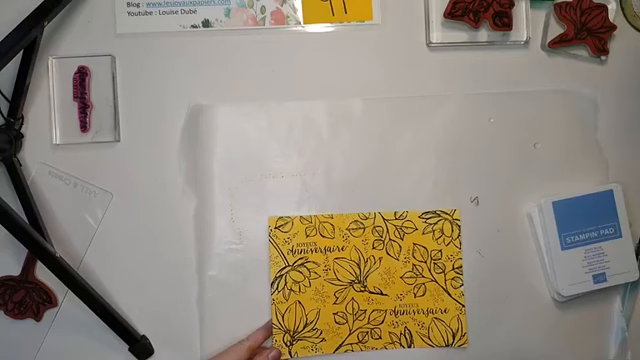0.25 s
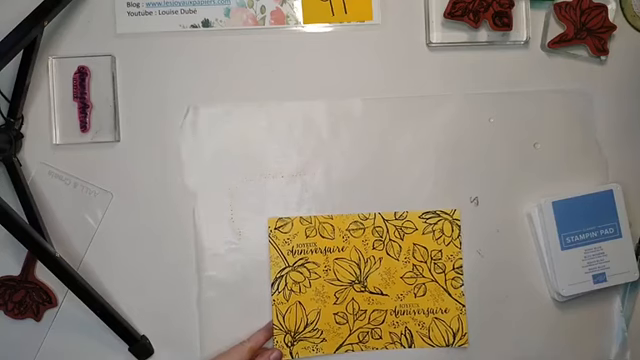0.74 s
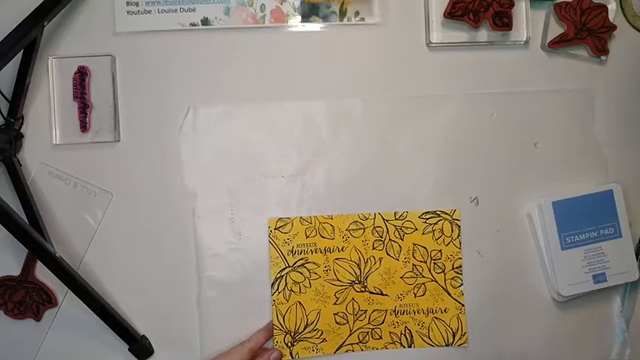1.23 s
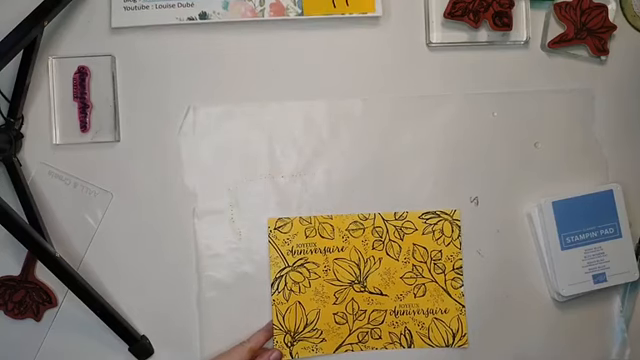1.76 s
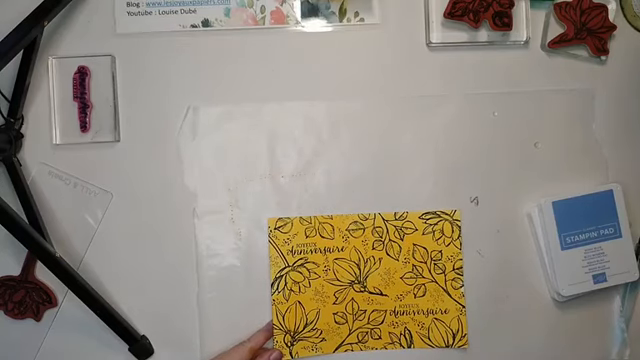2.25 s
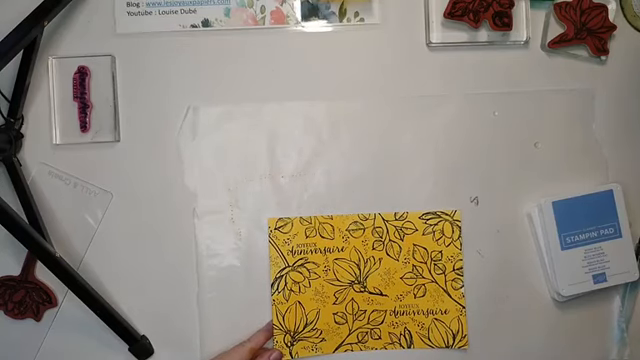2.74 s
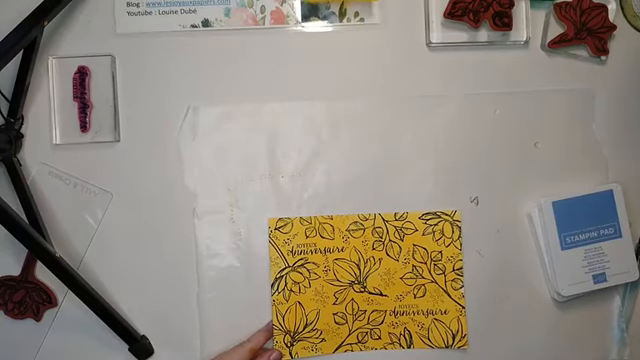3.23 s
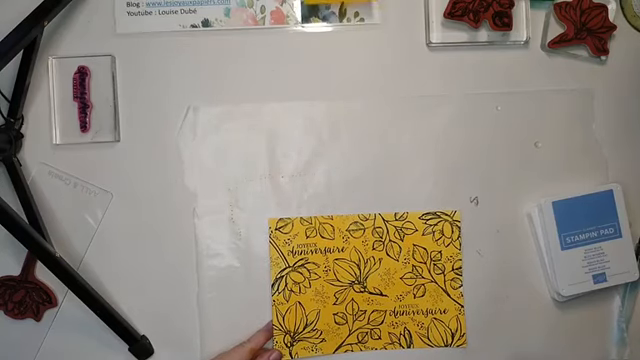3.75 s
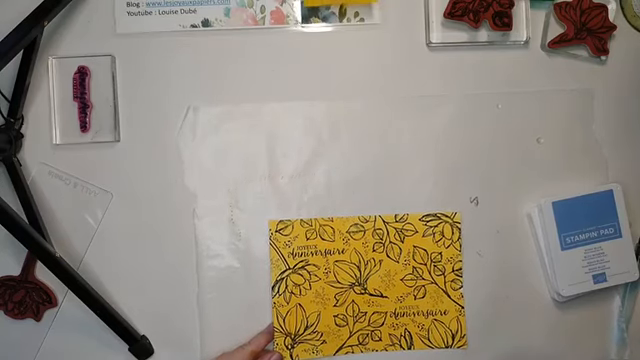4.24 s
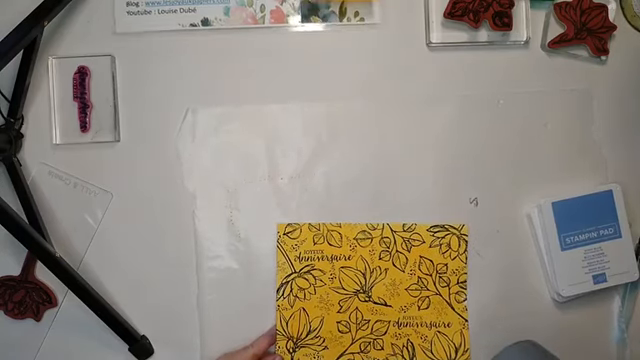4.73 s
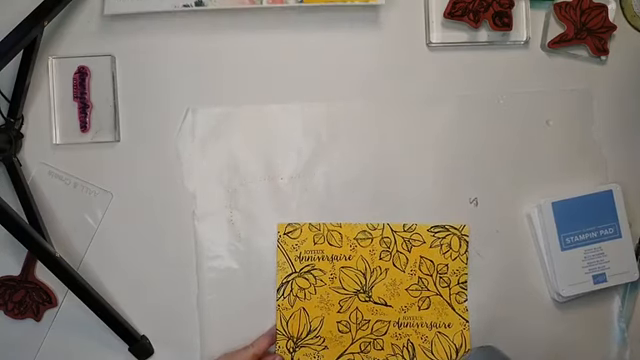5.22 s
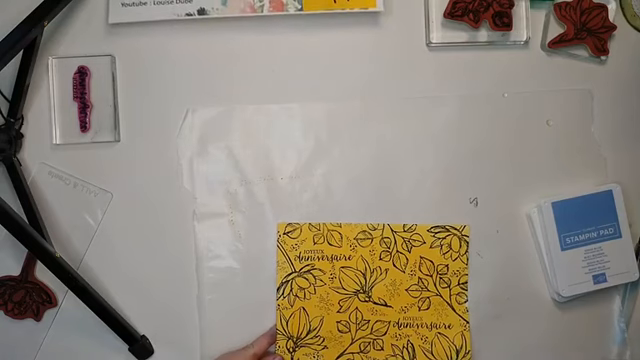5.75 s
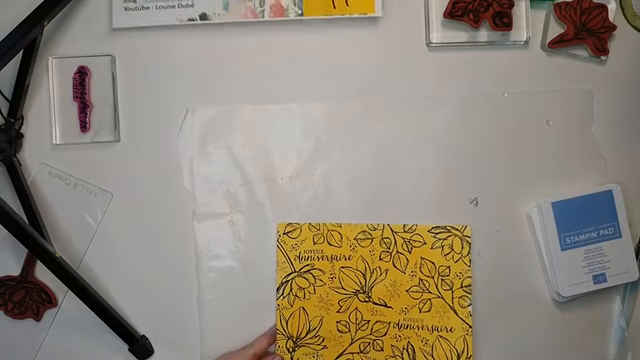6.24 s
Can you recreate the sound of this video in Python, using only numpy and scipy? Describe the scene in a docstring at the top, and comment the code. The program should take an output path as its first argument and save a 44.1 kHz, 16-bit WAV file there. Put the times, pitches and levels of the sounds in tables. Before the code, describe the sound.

A quiet small room with faint hiss and hum, then a crisp plastic switch snap. A handheld hot-air dryer spins up within about a second into a steady, breathy roar. As the nozzle moves near the table the roar turns hollow and a motor whine emerges; late on it drops to a thinner, fluttering blow with little hoots and chirps. Close, dull-topped mono microphone.

```python
"""First a brief burst of hiss and a soft rub over room air and hum, then a switch snaps: a hot-air dryer starts.
Shaped noise makes the fan rush, the jet roar and the low buffeting; the motor adds tones that rise with the fan.
An echo from the table hollows the roar as the nozzle moves, until it drops to a thinner blow.
Breathy tones and bands of hiss are noise around a pitch; puffs, hoots and chirps are brief sine notes.
A small room adds a short tail, and a narrow-band mono microphone picks it all up."""
import sys
import numpy as np
from scipy import signal
from scipy.fft import rfft, irfft, next_fast_len
from scipy.io import wavfile

SR = 44100
rng = np.random.default_rng(int(sys.argv[2]) if len(sys.argv) > 2 else 0)


def unload_audio(sound):
    """Save the sound as a 16-bit wav file, at the path given as the first command line argument."""
    columns = np.transpose(np.atleast_2d(sound))
    # keep every value between -1 and 1, then stretch to whole-number steps
    steps = np.round(np.clip(columns, -1, 1) * 32767)
    wavfile.write(sys.argv[1], SR, steps.astype(np.int16))


N = 285761

# Colour of the fan rush: f/Hz, level/dB
FAN_COLOUR = [(300, -46.5), (470, -33), (560, -18.5), (760, -9.5), (880, -2.5), (1250, -7), (1480, -4.5),
              (2000, -13.5), (4000, -20.5)]
# Colour of the jet roar: f/Hz, level/dB
JET_COLOUR = [(500, -23), (1000, -1.5), (1300, -12), (1530, -8.5), (1730, -1.65), (2200, 2), (2550, 0),
              (2950, -3.5), (3600, -3.5), (4300, -8), (5200, -9.5), (6400, -9), (7450, -11), (8000, -12)]
# Colour of the low buffeting: f/Hz, level/dB
BUFFET_COLOUR = [(25, -40), (50, -20.5), (90, -10.5), (150, -1), (225, -2.5), (280, -2), (370, 2.5),
                 (470, -1), (540, 9.5), (620, 11), (720, 8), (850, -5.5), (1400, -32)]
# Resonances of the housing: f/Hz, width/Hz, lift/dB
HOUSING_MODES = [(604, 110, 1.5), (902.7, 30, 11.5), (999, 29.6, 9.5), (1026, 24, -7.5), (1098, 57, 6),
                 (1208, 82, 9), (1310, 25, 4.5), (1582, 56, 3.5), (1810, 190, 3), (2150, 76, -1),
                 (2224, 37, 4.5), (2400, 130, 2.5), (3400, 310, 2.5), (4920, 110, -1)]
# Breathy tones and bands of hiss in the stream, some narrow, some broad:
# start t/s, end t/s, f/Hz, width/Hz, level/dB
BREATHY_BANDS = [(1.0, 1.254, 2487, 50, -34), (1.15, 1.65, 7090, 910, -42),
                 (2.202, 3.752, 3490, 260, -40.5), (2.85, 3.7, 3500, 563, -46),
                 (3.5, 4.603, 944.5, 69.5, -39), (3.6, 4.85, 1286, 40.7, -44.5),
                 (3.803, 4.02, 1270, 29.63, -36.5), (4.1, 4.802, 2166, 474, -37.5),
                 (3.8, 4.8, 4139, 547, -40), (3.8, 4.826, 6890, 644, -39), (3.9, 4.798, 3130, 130, -42.5),
                 (4.75, 5.796, 692, 49.7, -47.5), (4.73, 5.87, 4266, 130, -41),
                 (4.78, 5.84, 6726, 424.5, -39), (4.84, 5.904, 7360, 200, -45.5),
                 (4.85, 5.295, 2233, 100, -40), (4.85, 5.35, 1743, 89.5, -44),
                 (4.853, 5.35, 3185, 108, -47), (5.05, 5.548, 3853, 149.7, -43.5),
                 (4.85, 5.7, 5000, 220, -52), (5.3, 5.726, 1640, 108.5, -43), (5.35, 5.803, 2440, 40, -42),
                 (5.45, 6.598, 1161, 69, -46), (5.75, 6.55, 3526, 170, -47), (5.95, 6.599, 2333, 70, -47.5)]
# Short puffs as the stream flutters: t/s, low f/Hz, low level/dB, high f/Hz, high level/dB
PUFF_LIST = [(0.711, 1152, -38, 3370, -46), (0.859, 1000, -33, 2130, -40), (0.915, 1080, -30, 2340, -41),
             (4.799, 918.4, -32.5, 2100, -31), (4.943, 1790, -36, 2250, -32.5),
             (5.544, 897, -37, 2494, -35), (5.578, 923, -38, 2460, -52), (5.649, 900, -35, 2500, -42),
             (5.794, 888, -36, 2400, -35.5), (6.025, 923, -37, 3490, -50), (6.11, 909, -28.5, 2147, -37),
             (6.136, 906, -31.5, 3480, -37.5), (6.179, 902, -31, 2330, -34), (6.359, 1150, -32, 3580, -45)]
# Short, low hoots: start t/s, end t/s, f/Hz, level/dB
HOOT_LIST = [(4.296, 4.349, 648, -42.5), (4.39, 4.42, 720, -40.5), (4.453, 4.48, 694, -37),
             (4.605, 4.668, 626, -42), (4.79, 4.86, 716, -42.5), (4.882, 4.946, 699, -41.5),
             (5.045, 5.085, 701, -39.5), (5.156, 5.21, 694, -43.5), (5.263, 5.308, 683, -40.5),
             (5.321, 5.377, 710, -42), (5.728, 5.777, 708, -43)]
# Lulls and surges of the stream during spin-up: start t/s, end t/s, level/dB
SURGE_LIST = [(0.365, 0.425, 0.5), (0.47, 0.546, 1), (0.695, 0.735, 0), (0.885, 0.91, -0.5)]
# Passing dips in parts of the stream, low and high, after the nozzle first tilts:
# start t/s, end t/s, centre f/Hz, width/Hz, depth as level/dB
STREAM_DIPS = [(2.82, 3.3, 6025, 449, -3.5), (3.2, 3.799, 4550, 500, -2.5), (3.55, 4.1, 6046, 451.6, -3),
               (2.83, 3.45, 723, 111.2, -7), (3.448, 3.696, 596, 140, -3), (3.74, 3.997, 597, 180, -3.5),
               (4.66, 4.778, 800, 422, -6.5), (5.8, 6.6, 3020, 260, -1)]
# The hand steadies the nozzle, tilts it, closes in, turns it aside, slips off the surface and eases back.
# Start t/s, length t/s, then what each move adds: fan level/dB, jet level/dB, buffeting level/dB,
# housing ring level/dB, flutter/dB, echo strength (share), echo round trip/ms
HAND_MOVES = [(1.551, 0.75, -0.53, -1.02, -0.5, -2.5, 0.13, 0.023, 0.0029),
              (2.757, 0.14, -2, 0, -7.5, -2, 1.38, 0.088, -0.062),
              (3.38, 0.17, -0.7, 0, -1.5, -3.5, -0.36, 0.13, -0.1),
              (3.603, 0.46, -2.5, 0.26, -0.5, -3, 0, 0.072, -0.07),
              (4.542, 0.27, -8, 0.54, 0.1, 1.5, 1.5, 0.032, -0.02),
              (4.811, 0.044, -3.5, -9.5, 0, 0, 0.1, -0.29, 0.018),
              (4.946, 0.88, 4, -0.5, 0.2, -6, -0.5, 0.026, 0.24)]
# Motor tones: multiple of the shaft rate, level/dB
MOTOR_TONES = [(1, -66.5), (4, -41.5)]
# Switch contacts: t/s, level/dB before colouring
CONTACTS = [(.204, -66), (0.2723, -45), (0.2752, -22), (0.2756, -15), (0.2784, -27), (.433, -52)]
# Modes of the switch and shell: f/Hz, relative level/dB, time to fall by 60 dB t/s
SHELL_MODES = [(905, -18, .04), (2610, -9, .045), (2910, -7, .045), (3150, -11, .04), (3480, -8, .04),
               (4650, -5, .025), (4950, -4, .025), (5270, -5, .03), (6230, -7, .03), (7200, -5, .035)]
# Colour given to all the switch sounds: f/Hz, level/dB
SWITCH_COLOUR = [(100, -21), (300, -25), (600, -23), (920, -9), (1300, -12), (1800, -8), (2600, -2.5),
                 (3200, 0), (4000, -3.5), (4900, 2), (5700, -5), (6500, -2), (7300, -1)]
# A brief burst of hiss, then a soft rub, before the snap: start t/s, end t/s, centre f/Hz, width/Hz, level/dB
EARLY_HISS = [(-.02, 0.033, 4370, 5200, -61), (0.07, 0.178, 2450, 800, -82)]
# Colour of the room air: f/Hz, level/dB
ROOM_COLOUR = [(30, -3.5), (100, 4.5), (250, -6), (1200, -7), (2400, -6), (4000, -6), (7500, -10)]

TIME = np.arange(N) / SR
SIZE = next_fast_len(N)
FREQ = np.maximum(np.arange(SIZE // 2 + 1) * SR / SIZE, 1)
ROLL_OFF_HZ, TOP_HZ = 7780, 7950
ON_S, SPIN_UP_S = .28, .41
# Levels at full speed with the nozzle aimed straight at the table
FAN_DB, JET_DB, BUFFET_DB, RING_DB = -27, -26, -39, -36
# Each sound grows as this power of the fan speed
FAN_POWER, JET_POWER, BUFFET_POWER = 2.62, 3.23, 1.72
# At that aim: flutter of the eddies, strength of the table echo (0-1), its round trip
FLUTTER_DB, ECHO, TRIP_MS = 0, 0.014, 2.83
GUST_LIMIT = 2.1  # random values are cut off here before scaling
PUFF_S = 0.009  # time from the peak of a puff to about 61 % of it
PUFF_RUSH_DB = 2.5  # lift of the fan rush at the peak of a puff
RING_SWELL_DB = 2.8
# Breathy bands: bend is the power by which pitch rises as the gap narrows; warble is a share of pitch
BAND_BEND, WARBLE, SPUTTER_DB, BAND_FADE_S = 0.3, 0.006, 1.7, 0.14
HOOT_WAVER, HOOT_FADE_S = 0.015, 0.025  # waver is a share of pitch
# Stray chirps off the surface: detuning and glide are shares of pitch, the length is the average
STRAY_FROM_S, STRAY_DETUNE, STRAY_S, STRAY_GLIDE = 4.85, 0.035, 0.04, 0.035
STRAY_DB, STRAY_LIFT_DB = -38.7, 4  # lowest peak level, and the most that chance adds
SHAFT_HZ, BLADE_COUNT = 226.85, 6  # shaft rate at full speed
LINE_FLICKER_DB, LINE_JITTER_HZ = 2, 4
# Blade tone: level against the fan rush, and its lift near the duct resonance
BLADE_DB, DUCT_HZ, DUCT_WIDTH_HZ, DUCT_DB = -16.5, 1164, 236, 13.5
# Whine: usual level, and its lift while the intake faces the microphone
WHINE_DB, FACING_FROM_S, FACING_TO_S, FACING_DB = -64, 3.1, 5.42, 23.5
# Breathy part against the clean core of the whine, its width, and the flicker of the level
WHINE_BREATH_DB, WHINE_WIDTH_HZ, WHINE_SPUTTER_DB = -4, 45, 0.8
# Thin high motor tone: multiple of shaft rate, level, and its lift once the nozzle has eased back
THIN_ORDER, THIN_DB, THIN_LIFT_DB, THIN_CLEAR_S = 20, -57, 5.5, 5.8
# Switch, before colouring: ringing level, fading time of the crack, dull knock of the handle
SHELL_DB, CRACK_DECAY_S = -20, 0.0025
THUD_HZ, THUD_DB, THUD_T60_S = 190, -27, 0.12


def airflow(speed, fan_shade_db, jet_shade_db, ring_shade_db, flutter_db):
    """Fan rush and jet roar, both coloured by the housing and shaken by turbulence."""
    housing_db = sum(db / (1 + (2 * (FREQ - hz) / width) ** 2) for hz, width, db in HOUSING_MODES)
    housing = undb(housing_db)
    puff_db = PUFF_RUSH_DB * sum(swell(s) for s, *_ in PUFF_LIST)
    gust_db = 0.45 * flutter_db * wander(18)
    fan_db = FAN_DB + fan_shade_db + puff_db + gust_db
    fan = noise(colour(FAN_COLOUR) * housing) * undb(fan_db)
    jet_db = JET_DB + jet_shade_db + 0.17 * puff_db + 0.083 * wander(22)
    jet = eddies(colour(JET_COLOUR) * housing, flutter_db) * undb(jet_db)
    ring = ringing() * undb(RING_DB + ring_shade_db)
    return fan * speed ** FAN_POWER + (jet + ring) * speed ** JET_POWER


def eddies(gain, flutter_db, rate_hz=24, count=32):
    """Turbulent noise: each narrow band swells and fades on its own."""
    centres, spacing = np.linspace(0, TOP_HZ, count, retstep=True)
    out = np.zeros(N)
    for hz in centres:
        band = np.sqrt(np.maximum(1 - np.abs(FREQ - hz) / spacing, 0))
        band_noise = shaped(rng.standard_normal(N), gain * band)
        out += band_noise * undb(flutter_db * wander(rate_hz))
    # hold the average energy steady as the flutter grows
    return unit(out * np.exp(-np.log(undb(flutter_db)) ** 2))


def ringing():
    """Gusts excite the upper housing resonances, each swelling and drifting in pitch on its own."""
    out = np.zeros(N)
    for hz, width, db in HOUSING_MODES:
        if db > 0 and 800 < hz < 4000:
            note = tone(hz * (1 + .016 * wander(9)), 0.44 * width)
            out += note * undb(db / 4 + RING_SWELL_DB * wander(16))
    return unit(out)


def buffeting(speed, shade_db):
    """Low eddies in the jet; the deep and the upper ones gust separately."""
    air = noise(colour(BUFFET_COLOUR))
    deep = shaped(air, 1 / (1 + (FREQ / 330) ** 6))
    upper = air - deep
    gusts = deep * undb(1.3 * wander(10)) + upper * undb(1.8 * wander(15))
    return gusts * undb(BUFFET_DB + shade_db) * speed ** BUFFET_POWER


def surges():
    """The stream takes hold unevenly while the fan spins up."""
    return undb(sum(db * gate(start, end, 0.025) for start, end, db in SURGE_LIST))


def aim():
    """The moves of the hand add up, each sliding to its new setting and staying there."""
    moved = sum(np.outer(change, ramp(start, length)) for start, length, *change in HAND_MOVES)
    fan, jet, buffet, ring, flutter, echo, trip = moved
    return fan, jet, buffet, ring, FLUTTER_DB + flutter, np.clip(ECHO + echo, 0, 1), TRIP_MS + trip


def table_echo(air, strength, trip_ms):
    """The table throws the stream back; three cancelling round trips carve moving hollows in the midrange."""
    midrange = shaped(air, colour([(450, -20), (680, 0), (1700, 0), (1900, -20), (2600, -40)]))
    hollow = midrange
    for _ in range(3):
        echo = np.interp(TIME - trip_ms / 10 ** 3, TIME, hollow)
        hollow = (hollow - strength * echo) / (1 + 1.37 * strength ** 2)
    return air - midrange + hollow


def dipped(air):
    """Parts of the stream, low and high, sink for a while and come back."""
    out = air.copy()
    for start, end, hz, width, db in STREAM_DIPS:
        band = shaped(air, 1 / (1 + (2 * (FREQ - hz) / width) ** 4))
        out -= band * gate(start, end, 0.08) * (1 - undb(db))
    return out


def breathy_bands(trip_ms):
    """Breathy tones and bands of hiss come and go, flickering; their pitch rises as the table gap narrows."""
    bend = (TRIP_MS / trip_ms) ** BAND_BEND
    out = np.zeros(N)
    for start, end, hz, width, db in BREATHY_BANDS:
        band = tone(hz * bend * (1 + WARBLE * wander(14)), width)
        out += band * gate(start, end, BAND_FADE_S) * undb(db + SPUTTER_DB * wander(20))
    return out


def puffs():
    """Each puff makes a low and a high resonance speak for a moment."""
    out = np.zeros(N)
    for s, low_hz, low_db, high_hz, high_db in PUFF_LIST:
        low = undb(low_db) * np.sin(2 * np.pi * low_hz * TIME)
        high = undb(high_db) * np.sin(2 * np.pi * high_hz * TIME)
        out += swell(s) * np.sqrt(2) * (low + high)
    return out


def swell(s):
    """The brief rise and fall of a puff."""
    return np.exp(-.5 * np.minimum(np.abs(TIME - s) / PUFF_S, 10) ** 2)


def hoots():
    """A low tone catches and breaks off, wavering, at a new pitch each time."""
    waver = 1 + HOOT_WAVER * wander(24)
    return sum(line(hz * waver) * gate(start, end, HOOT_FADE_S) * undb(db)
               for start, end, hz, db in HOOT_LIST)


def stray_chirps(count):
    """The free jet catches housing resonances at random: brief gliding notes, each a little off pitch."""
    out = np.zeros(N)
    notes = [hz for hz, width, db in HOUSING_MODES if db > 0 and 1050 < hz < 4000]
    for when, pick, detune, length, glide, size in rng.random((count, 6)):
        age = TIME - STRAY_FROM_S - when * (TIME[-1] - STRAY_FROM_S)
        span = STRAY_S * (.5 + length)
        on = (age > 0) & (age < span)
        part = age[on] / span  # 0 to 1 through the note
        off_pitch = STRAY_DETUNE * (2 * detune - 1) + STRAY_GLIDE * (2 * glide - 1) * part
        hz = notes[int(pick * len(notes))] * (1 + off_pitch)
        note = np.sin(2 * np.pi * np.cumsum(hz) / SR) * np.sin(np.pi * part)
        out[on] += note * undb(STRAY_DB + STRAY_LIFT_DB * size)
    return out


def motor(speed, fan_shade_db, jet_shade_db):
    """Shaft and blade tones follow the spin of the fan; the brushes sing briefly as it starts."""
    shaft_hz = SHAFT_HZ * speed * (1 + 0.00048 * wander(2.62))
    blade_hz = BLADE_COUNT * shaft_hz
    hum = sum(line(order * shaft_hz) * undb(db) for order, db in MOTOR_TONES) * speed ** 8
    duct_db = DUCT_DB / (1 + (2 * (blade_hz - DUCT_HZ) / DUCT_WIDTH_HZ) ** 2)
    blades = tone(blade_hz, width_hz=85) * undb(FAN_DB + fan_shade_db + BLADE_DB + duct_db)
    whine_db = WHINE_DB + FACING_DB * gate(FACING_FROM_S, FACING_TO_S, 0.17)
    # the whine sits at twice the blade rate
    breath = undb(WHINE_BREATH_DB) * tone(2 * blade_hz, WHINE_WIDTH_HZ)
    whine = unit(line(2 * blade_hz) + breath) * undb(whine_db + WHINE_SPUTTER_DB * wander(16))
    thin_db = THIN_DB + THIN_LIFT_DB * ramp(THIN_CLEAR_S, 0.15)
    thin = tone(THIN_ORDER * shaft_hz, width_hz=30) * undb(thin_db)
    brush_tone = unit(line(5310) + .5 * tone(5310, width_hz=130))
    brushes = brush_tone * gate(.38, .58, .04) * undb(-66.5 + 7 * ramp(.42, .1))
    # the hum is shaded together with the jet
    return hum * undb(1.5 * jet_shade_db) + (blades + whine + thin) * speed ** FAN_POWER + brushes


def switch():
    """Each contact gives a dry crack, knocks the handle and lightly rings the plastic shell."""
    out = np.zeros(N)
    for s, db in CONTACTS:
        age = np.maximum(TIME - s, 0)[:SR]
        ring = np.zeros(SR)
        for hz, mode_db, t60 in SHELL_MODES:
            fade = undb(SHELL_DB + mode_db - 60 * age / t60)
            ring += rng.choice([-1, 1]) * fade * np.sin(2 * np.pi * hz * age)
        thud = undb(THUD_DB - 60 * age / THUD_T60_S) * np.sin(2 * np.pi * THUD_HZ * age)
        crack = rng.standard_normal(SR) * (age > 0) * np.exp(-age / CRACK_DECAY_S)
        out[:SR] += undb(db) * (ring + thud + crack)
    return shaped(out, colour(SWITCH_COLOUR))


def room(x, t60, wet_db):
    """Desk and walls scatter the sound into a short tail of fading noise."""
    age = TIME[:SR // 2]
    tail = rng.standard_normal(len(age)) * undb(-60 * age / t60) * (age > .004)
    tail = tail / np.sqrt(np.sum(tail ** 2))
    return x + undb(wet_db) * signal.fftconvolve(x, tail)[:N]


def background():
    """Room air as soft noise, mains hum as a 100 Hz sine, and an early burst of hiss and a soft rub."""
    early = np.zeros(N)
    for start, end, hz, width, db in EARLY_HISS:
        band = noise(1 / (1 + (2 * (FREQ - hz) / width) ** 4))
        early += band * gate(start, end, 0.037) * undb(db)
    air = noise(colour(ROOM_COLOUR)) * undb(-81)
    hum = np.sin(2 * np.pi * 100 * TIME) * undb(-83.5)
    return air + hum + early


def undb(db):
    """Turn decibels into gain."""
    return 10 ** (np.asarray(db) / 20)


def unit(x):
    """Scale to an rms (average strength) of 1."""
    return x / np.sqrt(np.mean(x ** 2))


def colour(points):
    """Gain at every frequency from (f/Hz, level/dB) points, falling away below the first."""
    hz, db = np.transpose(points)
    return undb(np.interp(np.log(FREQ), np.log(hz), db)) * np.minimum(FREQ / hz[0], 1) ** 2


def shaped(x, gain):
    """Filter by a gain at every frequency."""
    return irfft(rfft(x, SIZE) * gain, SIZE)[:N]


def noise(gain):
    """Noise of rms 1 with the given colour."""
    return unit(shaped(rng.standard_normal(N), gain))


def wander(rate_hz):
    """Slow random change of rms 1, without extreme swings."""
    steps = np.cumsum(np.full(N, 2 * rate_hz / SR))  # two random points per cycle
    knots = np.clip(rng.standard_normal(1024), -GUST_LIMIT, GUST_LIMIT)
    return unit(np.interp(steps, np.arange(len(knots)), knots))


def tone(hz, width_hz):
    """A breathy tone: a pitch whose size and phase waver, becoming a band of hiss when wide."""
    phase = 2 * np.pi * np.cumsum(hz * np.ones(N)) / SR
    skirt = 1 / (1 + (FREQ / (0.76 * width_hz)) ** 2)
    return unit(noise(skirt) * np.cos(phase) + noise(skirt) * np.sin(phase))


def line(hz):
    """A clean tone, shaken slightly in pitch and level by the moving air."""
    phase = 2 * np.pi * np.cumsum(hz + LINE_JITTER_HZ * wander(25)) / SR
    return unit(np.sin(phase) * undb(LINE_FLICKER_DB * wander(25)))


def gate(start, end, fade):
    """Open between two times, with soft edges."""
    return np.clip(np.minimum(TIME - start, end - TIME) / fade + .5, 0, 1)


def ramp(start, length):
    """Go from 0 to 1 over a stretch of time."""
    return np.clip((TIME - start) / length, 0, 1)


def scene():
    """The fan gathers speed after the snap and the hand moves the nozzle; both channels are the same."""
    speed = 1 - np.exp(-np.maximum(TIME - ON_S, 0) / SPIN_UP_S)
    fan_db, jet_db, buffet_db, ring_db, flutter_db, echo, trip_ms = aim()
    stream = airflow(speed, fan_db, jet_db, ring_db, flutter_db) + buffeting(speed, buffet_db)
    air = dipped(table_echo(stream * surges(), echo, trip_ms))
    air = air + breathy_bands(trip_ms) + puffs() + hoots() + stray_chirps(count=44)
    mono = room(air, t60=0.095, wet_db=-13.0) + motor(speed, fan_db, jet_db)
    mono = mono + room(switch(), t60=0.22, wet_db=-8.5) + background()
    return np.array([mono, mono])


def record(dry):
    """The microphone rolls off steeply and passes almost nothing above the speech band."""
    roll_off = 1 / np.sqrt(1 + (FREQ / ROLL_OFF_HZ) ** 60)
    soft = np.array([shaped(channel, roll_off) for channel in dry])
    return signal.sosfilt(signal.ellip(10, .2, 80, TOP_HZ, fs=SR, output="sos"), soft)


dry = scene()
out = record(dry)
unload_audio(out)
```